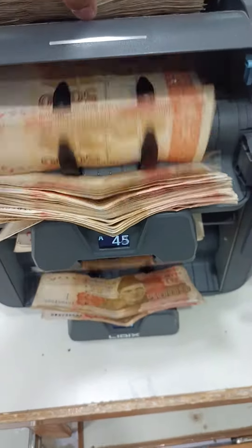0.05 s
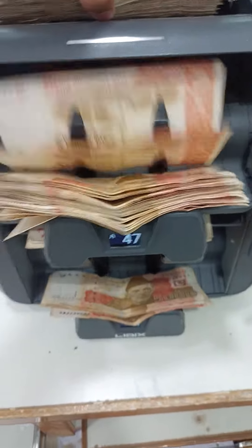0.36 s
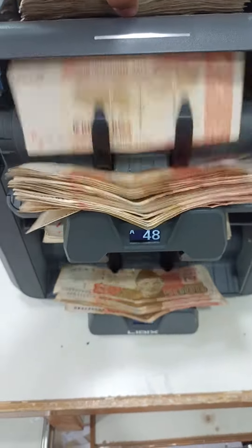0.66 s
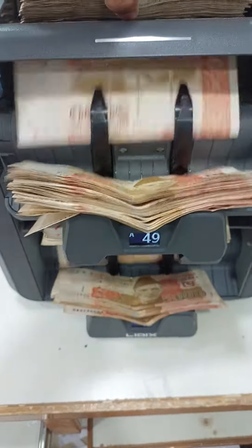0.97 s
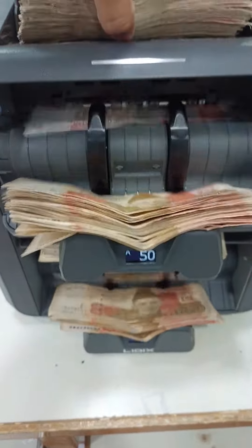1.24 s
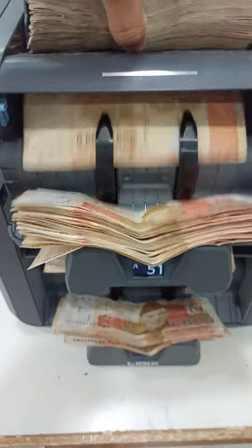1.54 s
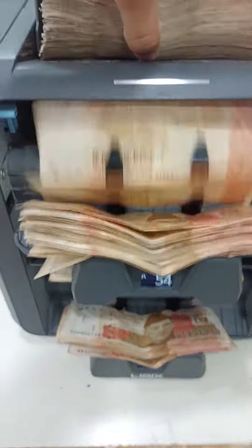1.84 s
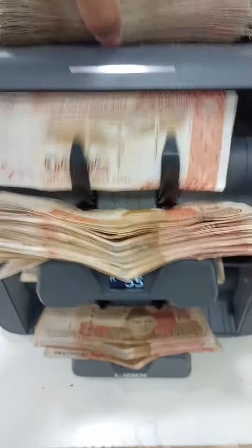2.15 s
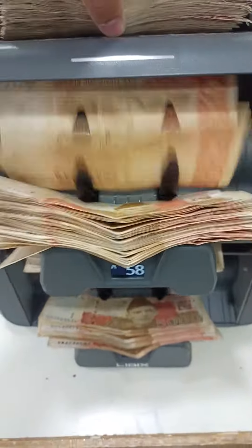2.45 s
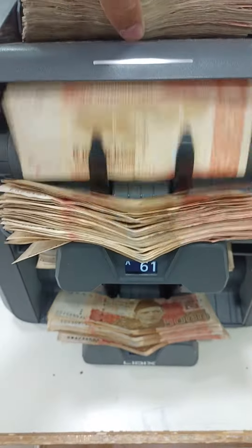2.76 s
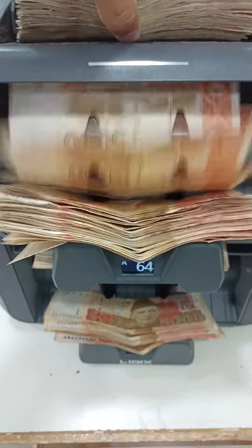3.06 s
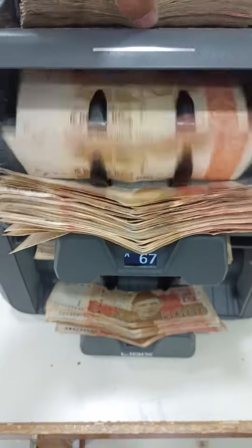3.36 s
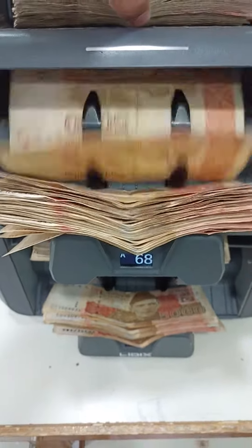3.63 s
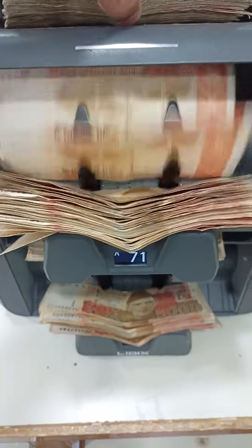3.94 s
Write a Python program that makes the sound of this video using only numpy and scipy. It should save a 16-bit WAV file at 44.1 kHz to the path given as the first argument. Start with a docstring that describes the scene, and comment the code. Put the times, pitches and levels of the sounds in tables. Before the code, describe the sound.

A banknote counter runs without a break on a desk, close to the microphone. Paper notes flutter, click and snap into the stacker in a fast stream, over a wavering motor whine and rattling rollers.

```python
"""On a desk, close by, a banknote counter feeds about eleven notes a second. Its motor hums and its gears
whine, dropping in pitch as each note is picked up. The paper rumbles low and the rollers rattle in the plastic
housing. The notes hiss off the pile, knock against the guides and snap into the stacker wheels."""
import sys
import numpy as np
from scipy import signal
from scipy.fft import rfft, irfft, next_fast_len
from scipy.io import wavfile
from scipy.ndimage import uniform_filter1d, minimum_filter1d, map_coordinates

SR = 44100
rng = np.random.default_rng(int(sys.argv[2]) if len(sys.argv) > 2 else 0)


def store_wav(level_fs):
    """Save 16-bit WAV to argv[1]."""
    pcm = np.round(np.clip(np.atleast_2d(level_fs), -1, 1) * 32767)
    wavfile.write(sys.argv[1], SR, pcm.T.astype(np.int16))


N = 4 * SR
TIME_S = np.arange(N) / SR


def amp(db):
    """Turn decibels into a multiplier: -6 dB is about half."""
    return 10 ** (np.asarray(db) / 20)


def unit(x):
    """Scale a sound to an average (rms) strength of 1."""
    return x / np.sqrt(np.mean(x ** 2) + 1e-20)


def at_pitch(points, hz):
    """Read between (pitch_hz, value) rows, with octaves evenly spaced."""
    pitches, values = np.transpose(points)
    return np.interp(np.log(hz + 1), np.log(pitches + 1), values)


def curve(rows):
    """Join (time_s, value) rows into one value per sample."""
    return np.interp(TIME_S, *np.transpose(rows))


def wobble(rate_hz):
    """Glide smoothly through rate_hz random values a second."""
    values = rng.standard_normal(int(N * rate_hz / SR) + 4)
    return map_coordinates(values, [TIME_S * rate_hz])


def colour(x, points):
    """Make some pitches louder and others softer, following (pitch_hz, gain_db) rows."""
    size = 2 * next_fast_len(len(x))
    gain = amp(at_pitch(points, np.fft.rfftfreq(size, 1 / SR)))
    cepstrum = irfft(np.log(gain))
    # Fold the filter so that it rings after a hit, never before.
    cepstrum[1:size // 2] *= 2
    cepstrum[size // 2 + 1:] = 0
    return irfft(rfft(x, size) * np.exp(rfft(cepstrum)))[:len(x)]


def noise(points):
    """Steady noise of strength 1 with the given tone."""
    return unit(colour(rng.standard_normal(N), points))


def add(track, start_s, sound):
    """Mix a sound into the track at start_s."""
    i = max(0, round(start_s * SR))
    track[i:i + len(sound)] += sound[:max(0, N - i)]


def burst(attack_s, hold_s, fade_s):
    """A puff of noise that rises, holds, then falls 60 dB in fade_s."""
    t = np.arange(SR // 12) / SR
    rise = 1 - np.exp(-t / attack_s)
    fall = amp(-60 * np.maximum(t - hold_s, 0) / fade_s)
    return rng.standard_normal(len(t)) * rise * fall


# How long the echo takes to fall 60 dB: pitch_hz, fade_s
ECHO_FADES = [(150, 0.27), (1500, 0.079), (6000, 0.03), (15000, 0.13)]

def room_echo(sound):
    """The desk and walls throw back a short echo."""
    hz, t, spectrum = signal.stft(rng.standard_normal(SR // 3), SR, nperseg=256)
    fade = amp(-60 * t / at_pitch(ECHO_FADES, hz)[:, None])
    tail = signal.istft(spectrum * fade, SR, nperseg=256)[1]
    return signal.fftconvolve(sound, tail / np.linalg.norm(tail))[:N]


# How hard the paper rubs on the rollers: time_s, level_db
PAPER_LOAD = [(0.0, -24), (0.06, -22.5), (0.14, -19.5), (0.19, -25.5), (0.44, -19.0), (0.52, -24.5),
              (0.58, -21.5), (0.73, -23.5), (0.75, -26.5), (0.83, -18.5), (0.93, -19), (0.95, -21),
              (1.05, -24), (1.11, -17), (1.14, -22), (1.26, -23), (1.32, -26), (1.48, -17.5), (1.6, -20.0),
              (1.66, -17), (1.89, -18), (1.94, -28), (2.0, -20.5), (2.03, -23.5), (2.13, -20.5),
              (2.22, -23), (2.51, -18), (2.56, -23), (2.63, -22), (2.73, -18), (2.79, -20), (3.02, -17.0),
              (3.06, -23), (3.15, -20.5), (3.26, -21.5), (3.34, -17.5), (3.38, -20), (3.49, -17.5),
              (3.51, -24), (3.65, -21), (3.74, -22.5), (3.86, -19.5), (3.95, -20), (3.99, -18)]

def paper_load():
    """The paper's changing rub, in dB; rumble, hum and rollers all follow it."""
    return curve(PAPER_LOAD)


# Tone of the paper's low rumble: pitch_hz, gain_db
RUMBLE_TONE = [(40, -32), (90, -17.5), (140, -3.5), (280, 1.5), (500, 3), (900, -9.5), (3000, -55)]

def paper_rumble(load_db, rumble_db=-35, load_gain=1.49):
    """The paper rumbles low, swelling faster than its load does."""
    return amp(rumble_db + load_gain * (load_db - load_db.mean())) * noise(RUMBLE_TONE)


# The tones in the hum: cycles_per_turn, level_db
HUM_TONES = [(4, -51.5), (5, -43.5), (8, -48), (9, -48.5), (11, -48), (15, -47)]
# Slow rise and fall of the whole hum: time_s, gain_db
HUM_SWELL = [(0, -3), (.35, 4.5), (.8, 0.5), (4, -2)]

def motor_hum(angle, load_db, roughness=.17, load_gain=.6):
    """The spinning shaft hums in a few wavering tones, louder under load."""
    hum = 0
    for cycles, level_db in HUM_TONES:
        strength = amp(level_db) * (1 + roughness * wobble(6.34))
        hum += strength * np.sin(cycles * angle + roughness * wobble(18))
    return amp(curve(HUM_SWELL) + load_gain * (load_db - load_db.mean())) * hum


# Each note picked up drags on the motor: time_s, pitch_drop_hz, whine_level_db
NOTE_PICKS = [(0, 71.7, -35), (0.095, 61.5, -30.5), (0.226, 94.5, -30), (0.329, 50, -28.5),
              (0.421, 93.8, -28.5), (.51, 72.2, -31.5), (.6, 50.3, -33), (.68, 50.54, -34),
              (.76, 75.7, -26), (0.851, 64.1, -25.5), (.925, 80.2, -32.5), (1.015, 78, -33.5),
              (1.111, 70.2, -31), (1.209, 40.1, -37), (1.34, 110, -30), (1.41, 35, -27), (1.495, 90.1, -28),
              (1.59, 75, -25.5), (1.68, 75.4, -26), (1.755, 70.1, -25.5), (1.849, 84.6, -34),
              (1.948, 70, -27.5), (2.02, 62.04, -33.5), (2.127, 60.3, -29), (2.211, 89.4, -29),
              (2.295, 130, -29), (2.345, 65.06, -31), (2.39, 128.2, -22), (2.475, 100, -26),
              (2.58, 65.45, -32.5), (2.655, 80.5, -33), (2.74, 69.2, -27.5), (2.82, 107.9, -27),
              (2.905, 90, -22.5), (2.99, 65, -32), (3.081, 44.77, -34), (3.162, 109.5, -29),
              (3.245, 70.1, -28), (3.329, 80.36, -26.5), (3.42, 85, -24.5), (3.505, 104.4, -35),
              (3.59, 82.4, -27.5), (3.68, 80.45, -32), (3.771, 65.9, -28), (3.844, 74, -30),
              (3.949, 60.4, -28)]
GEAR_TEETH = 48

def pitch_drop(half_width_s=.031):
    """How many hertz the whine loses as each note slows the motor."""
    return sum(hz * np.exp(-((TIME_S - time_s) / half_width_s) ** 2) for time_s, hz, _ in NOTE_PICKS)


def shaft_angle(free_whine_hz=1553):
    """How far the shaft has turned, in radians; it slows at each note and recovers."""
    turns_per_s = (free_whine_hz - pitch_drop()) / GEAR_TEETH
    return 2 * np.pi * np.cumsum(turns_per_s) / SR


def gear_whine(angle, gain_db=6.6, dip_db_per_hz=.065, swell_delay_s=.045, roughness=.15):
    """Meshing teeth whine, dipping at each pick and swelling as the note is pulled through."""
    swell_db = curve([(time_s + swell_delay_s, db) for time_s, _, db in NOTE_PICKS])
    level_db = gain_db + swell_db - dip_db_per_hz * pitch_drop()
    phase = GEAR_TEETH * angle
    flutter = wobble(130) * np.sin(phase) + wobble(130) * np.cos(phase)
    return amp(level_db) * (np.sin(phase) + roughness * flutter)


# How strongly the sliding paper hisses: time_s, level_db
HISS_LEVELS = [(0.0, -48.5), (0.75, -55), (0.98, -51), (1.2, -53), (1.58, -50.5), (1.73, -39.5),
               (1.89, -37.5), (1.93, -48.5), (2.42, -39.5), (2.58, -46.5), (3.0, -46.5), (3.13, -48.5),
               (3.99, -48)]
# Tone of paper sliding on paper: pitch_hz, gain_db
HISS_TONE = [(3000, -30), (7000, -12), (8100, -10), (8900, 0), (9100, -1), (9350, 3), (9900, -4),
             (11000, -10), (13000, -22), (16000, -23)]
# Tone of a steady, very high sizzle: pitch_hz, gain_db
SIZZLE_TONE = [(8000, -12), (14000, -30), (15000, -5), (15700, 6), (15950, -22)]

def paper_hiss(gain_db=1, flutter_db=2, sizzle_db=-49):
    """Notes hiss as they slide off the pile, over a steady high sizzle."""
    hiss = amp(curve(HISS_LEVELS) + gain_db + flutter_db * wobble(74)) * noise(HISS_TONE)
    sizzle = amp(sizzle_db + 1.5 * wobble(60)) * noise(SIZZLE_TONE)
    return hiss + sizzle


# Tone of the plastic housing: pitch_hz, gain_db
HOUSING_TONE = [(40, -36), (82, -32), (100, -12), (135, -11.5), (205, -14), (260, -12.5), (380, -3.5),
                (440, -10.5), (520, -0.5), (630, 1), (700, -3.5), (780, 5.5), (870, 1.5), (970, -2.5),
                (1070, 2), (1180, 2), (1290, 4.5), (1430, 5.5), (1630, -2.5), (1830, 4), (2040, 0.5),
                (2170, 4), (2350, 1.5), (2550, 1.05), (3100, -0.7), (3500, -3.5), (3850, -4), (4500, -8.5),
                (5300, -8), (6600, -12.5), (7600, -21.5), (10000, -39), (14000, -29.5), (16000, -32)]

def rollers(angle, load_db, ribs=4, rub_db=-4, rattle_db=-4.5, flutter_db=1.82):
    """Paper rubs on the rollers and their ribs tap as they turn; both sound through the housing."""
    jitter_s, scatter_db, fade_s = .0016, 3.5, .026  # taps are uneven and short
    ribs_passed = np.floor(ribs * angle / (2 * np.pi))
    t = np.arange(SR // 50) / SR
    taps = np.zeros(N)
    for start_s in np.flatnonzero(np.diff(ribs_passed)) / SR:
        lateness, force = rng.standard_normal(2)
        tap_db = scatter_db * np.clip(force, -2, 1) - 60 * t / fade_s
        add(taps, start_s + jitter_s * lateness, amp(tap_db) * rng.standard_normal(len(t)))
    rub = noise(HOUSING_TONE) * amp(flutter_db * wobble(70))
    rattle = unit(colour(taps, HOUSING_TONE))
    return amp(load_db) * (amp(rub_db) * rub + amp(rattle_db) * rattle)


# Ring of a struck paper guide: pitch_multiple, gain_db
GUIDE_TONE = [(.1, -24), (.45, -9), (.75, -4), (1, .5), (1.35, -4), (2.2, -9), (4, -20), (12, -45)]
# Notes hit the guides, some hollow, some sharp: start_s, level_db, pitch_hz
GUIDE_KNOCKS = [(0.069, -20.5, 1150), (0.1249, -20, 1070), (0.1588, -16.5, 1210), (0.208, -18, 1390),
                (0.2965, -17, 1290), (0.457, -18.5, 1110), (0.4966, -20, 1350), (0.5875, -23, 2800),
                (0.7135, -20.5, 3530), (0.738, -28, 3320), (0.973, -21.5, 2370), (1.0079, -21, 1110),
                (1.1, -21, 1070), (1.128, -21, 3150), (1.1901, -17.5, 1250), (1.327, -22, 1184),
                (1.4262, -18, 1150), (1.4959, -26, 4040), (1.519, -22, 2370), (1.542, -19.5, 1820),
                (1.711, -19, 1340), (1.764, -26, 4276), (1.789, -29, 2284), (1.8407, -19, 1145),
                (1.8941, -20, 2041), (2.0769, -18.5, 1930), (2.3557, -19, 1338), (2.4314, -20, 1153),
                (2.4712, -20, 1107), (2.5938, -18.5, 2050), (2.765, -23, 2870), (2.7877, -20.5, 2756),
                (2.8121, -15.5, 1290), (2.8735, -20.5, 2047), (2.9298, -27, 4660), (2.951, -20, 2183),
                (3.0387, -20.5, 2988), (3.074, -16, 1383), (3.1662, -18, 2120), (3.2135, -17.5, 2120),
                (3.33, -20, 1503), (3.4166, -20, 1188), (3.538, -21.5, 2198), (3.6332, -23, 2283),
                (3.6702, -21, 2220), (3.7626, -23, 2400), (3.8074, -19.5, 2203), (3.9014, -16, 1558)]

def guide_knocks(gain_db=-9, soften_above_hz=6500):
    """Each blow, softened by the paper, rings a guide at the pitch of the spot it hits."""
    track = np.zeros(N)
    for start_s, level_db, pitch_hz in GUIDE_KNOCKS:
        blow = burst(attack_s=.0002, hold_s=.00086, fade_s=.018)
        tone = [(pitch_hz * multiple, db) for multiple, db in GUIDE_TONE]
        add(track, start_s, amp(level_db + gain_db) * unit(colour(blow, tone)))
    return signal.lfilter(*signal.butter(2, soften_above_hz, fs=SR), track)


# Thin ring of a flicked note: pitch_hz, gain_db
RING_TONE = [(200, -24), (1200, -9), (3200, -5), (3850, -2), (4400, -7), (5250, -6), (5550, -2), (5750, -5),
             (6000, 2), (6250, -4), (6500, -1), (6900, -5), (7500, -17), (9000, -34), (16000, -50)]
# Bright scrape of its edge: pitch_hz, gain_db
EDGE_TONE = [(3000, -40), (7000, -14), (8100, -12), (8900, -1), (9100, -3), (9350, 3), (9900, -11),
             (11000, -12), (13000, -14), (13900, -19), (14700, -6), (15100, -7), (15700, -1), (16000, -16)]
# Notes snap into the stacker: start_s, ring_level_db, edge_level_db
NOTE_SNAPS = [(0.0467, -8.5, -28.5), (0.0776, -6, -24.5), (0.125, -14, -33), (0.159, -14.5, -42),
              (0.249, -15.5, -40), (0.296, -17, -31), (0.409, -11, -38), (0.4334, -14, -40),
              (0.47, -9.5, -28.5), (0.5006, -8, -30.5), (0.558, -8.5, -29), (0.5865, -5.5, -28.5),
              (0.634, -15, -38), (0.6849, -7, -29.5), (0.713, -7, -47), (0.9225, -3.5, -24),
              (0.9726, -14, -35), (0.988, -10, -33), (1.0187, -7.5, -29), (1.068, -7, -32),
              (1.098, -14, -41), (1.128, -18, -51), (1.1627, -6.5, -32.5), (1.231, -12, -41),
              (1.2515, -6.5, -31), (1.2799, -8, -28), (1.3273, -14, -34), (1.5189, -12, -37),
              (1.6615, -14, -33), (1.711, -19, -31), (1.7631, -13, -40), (1.8124, -30, -23.5),
              (1.9006, -10.5, -23.5), (1.9309, -10, -23.5), (1.9981, -9.5, -24), (2.0288, -9, -22),
              (2.076, -20, -28.5), (2.1648, -9.5, -23.5), (2.1936, -13, -20.5), (2.2694, -10, -24),
              (2.3019, -8.5, -19), (2.383, -13.5, -38), (2.5633, -10.5, -25), (2.6551, -7.5, -21.5),
              (2.7867, -24, -31.5), (2.8245, -15.5, -45), (2.8491, -16, -40), (2.9051, -11, -40),
              (2.991, -14, -32), (3.015, -17, -34), (3.1626, -9.5, -35), (3.1907, -15, -37),
              (3.2147, -15, -32), (3.382, -14, -34), (3.5066, -7, -26.5), (3.586, -6, -26),
              (3.6716, -9, -28), (3.7006, -11, -49), (3.7612, -7, -24), (3.785, -13, -38),
              (3.8089, -20, -31), (3.8793, -12, -33), (3.9744, -14.5, -33)]

def note_snaps(ring_gain_db=-21, edge_gain_db=-11, even_mix_db=-30):
    """A note flicks free: the sheet rings and its edge scrapes, hissier when the note drags."""
    track = np.zeros(N)
    for start_s, ring_db, edge_db in NOTE_SNAPS:
        flick = burst(attack_s=.0004, hold_s=.003, fade_s=.026)
        ring = unit(colour(flick, RING_TONE))
        clean = unit(colour(flick, EDGE_TONE))
        dragging = unit(colour(flick, HISS_TONE))
        # With hiss above even_mix_db, dragging outweighs the clean edge.
        hiss_db = np.interp(start_s, *np.transpose(HISS_LEVELS))
        blend = np.arctan(amp(hiss_db - even_mix_db))
        edge = unit(np.cos(blend) * clean + np.sin(blend) * dragging)
        add(track, start_s, amp(ring_db + ring_gain_db) * ring + amp(edge_db + edge_gain_db) * edge)
    return track


def scene(echo_db=-13):
    """The whole machine in one channel; only the paper and rollers get an echo."""
    angle, load_db = shaft_angle(), paper_load()
    paper = note_snaps() + guide_knocks() + paper_hiss() + rollers(angle, load_db)
    echo = amp(echo_db) * room_echo(paper)
    machine = gear_whine(angle) + motor_hum(angle, load_db) + paper_rumble(load_db)
    return (paper + echo + machine)[None]


def record(dry, ceiling=.66, window_samples=50, bass_cut_hz=50, top_hz=15950):
    """Turn the loudest peaks down, thin the deep bass and remove the highest treble."""
    needed_gain = ceiling / np.maximum(np.abs(dry), ceiling)
    smooth_gain = uniform_filter1d(minimum_filter1d(needed_gain, window_samples), window_samples)
    hz = np.fft.rfftfreq(N, 1 / SR)
    band = hz / np.hypot(hz, bass_cut_hz) * (hz < top_hz)
    return irfft(rfft(dry * smooth_gain) * band, N)


dry = scene()
out = record(dry)
store_wav(out)
```